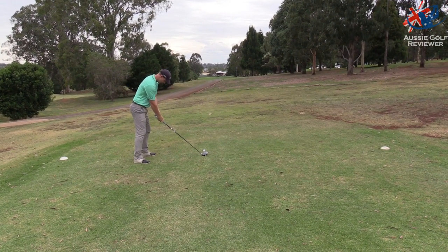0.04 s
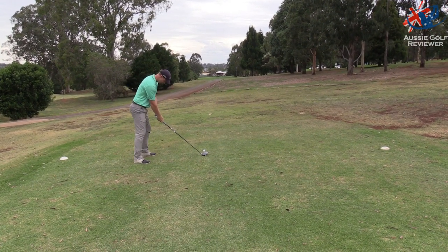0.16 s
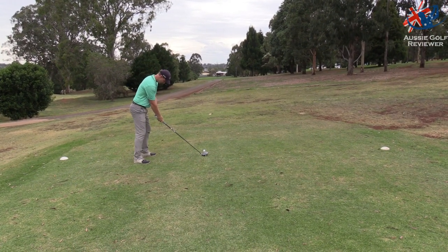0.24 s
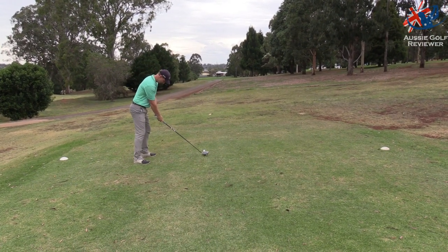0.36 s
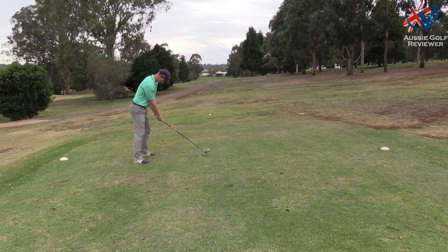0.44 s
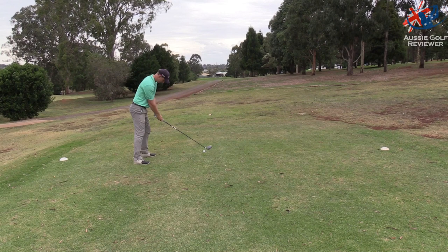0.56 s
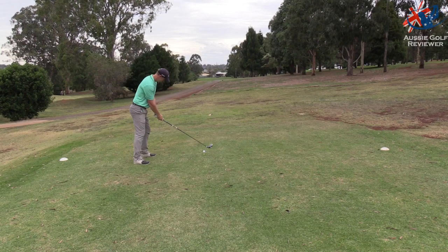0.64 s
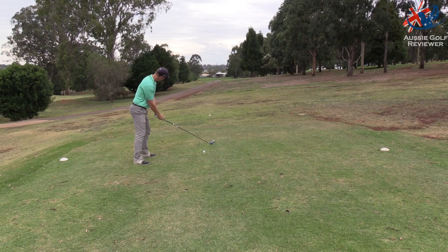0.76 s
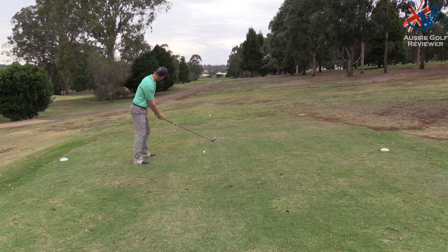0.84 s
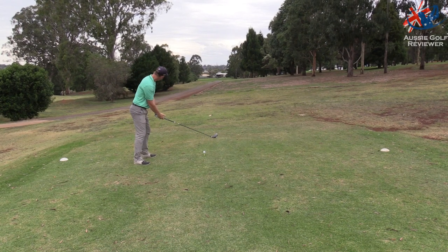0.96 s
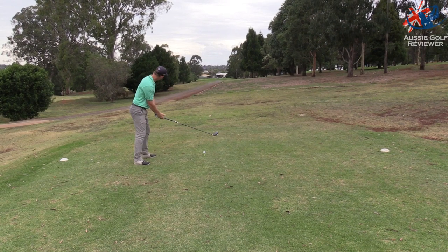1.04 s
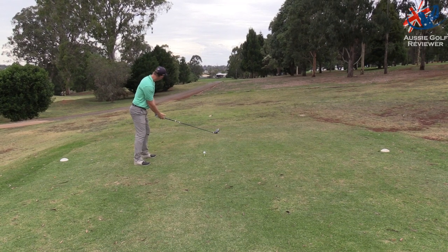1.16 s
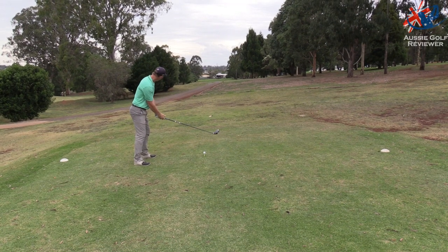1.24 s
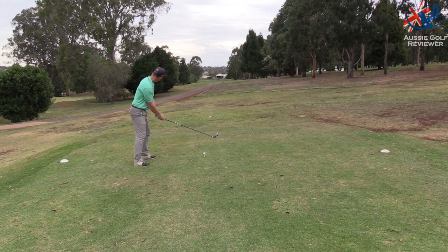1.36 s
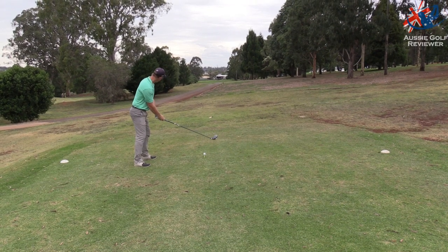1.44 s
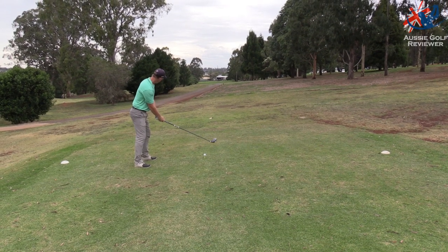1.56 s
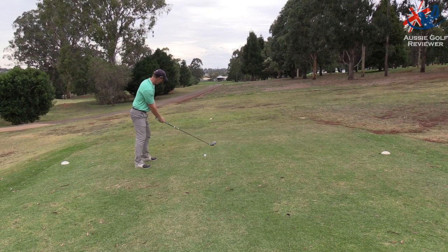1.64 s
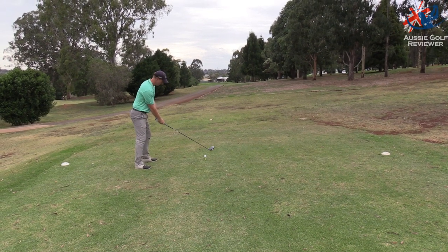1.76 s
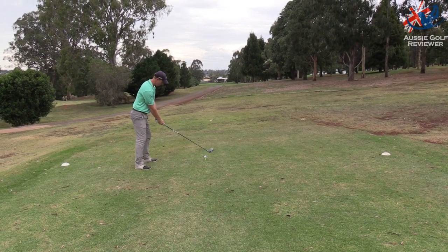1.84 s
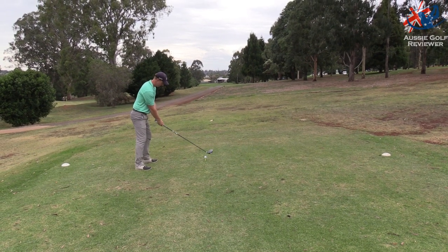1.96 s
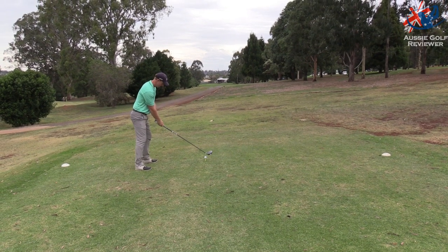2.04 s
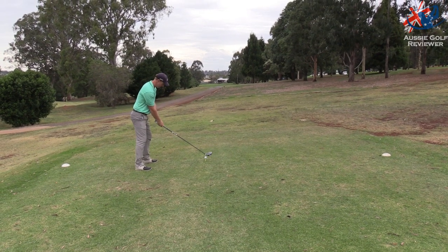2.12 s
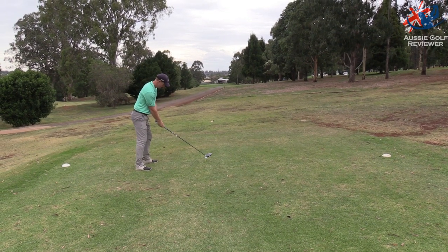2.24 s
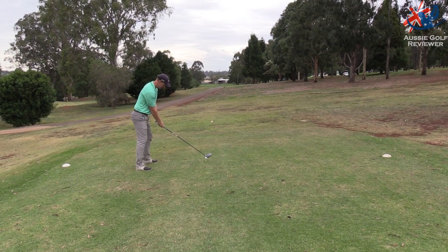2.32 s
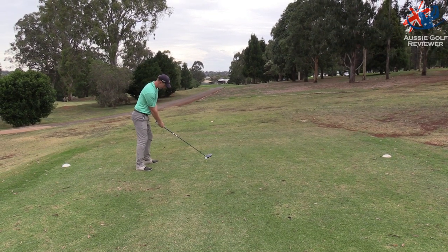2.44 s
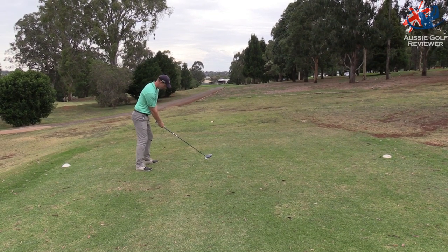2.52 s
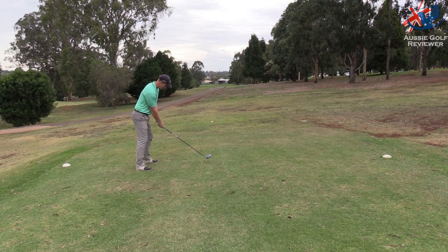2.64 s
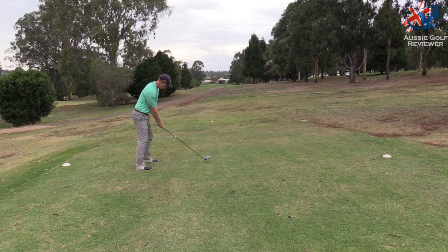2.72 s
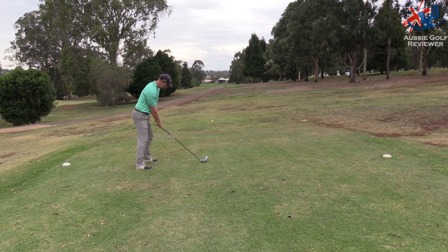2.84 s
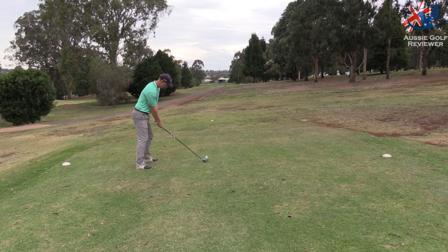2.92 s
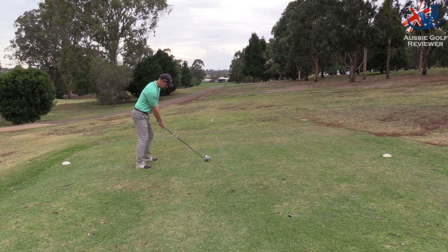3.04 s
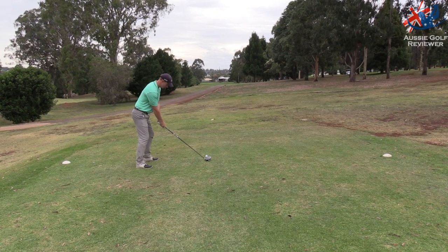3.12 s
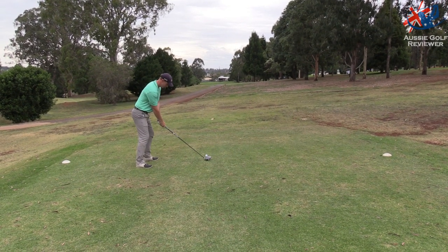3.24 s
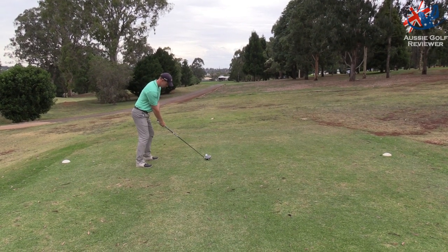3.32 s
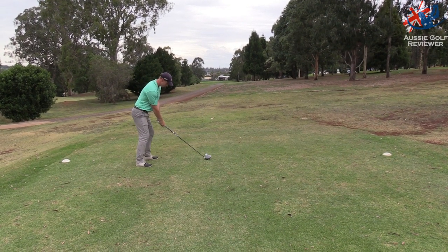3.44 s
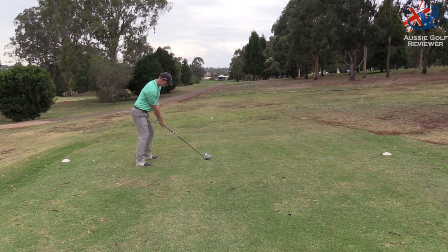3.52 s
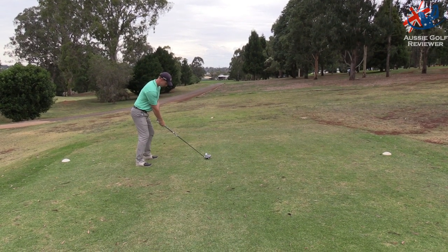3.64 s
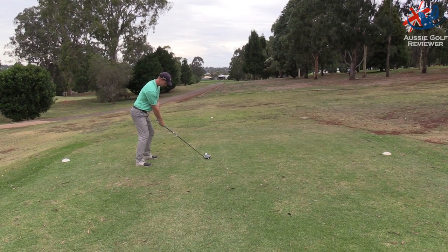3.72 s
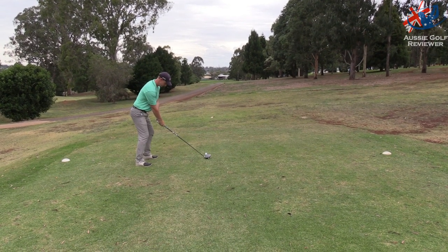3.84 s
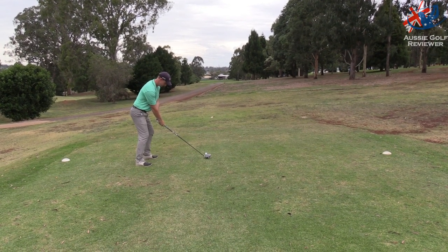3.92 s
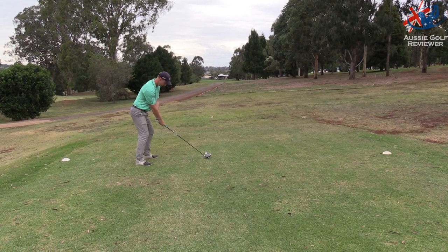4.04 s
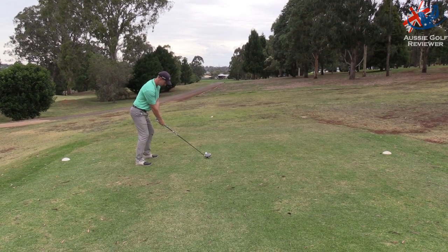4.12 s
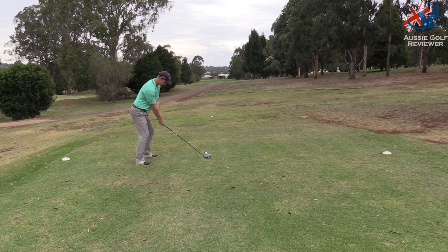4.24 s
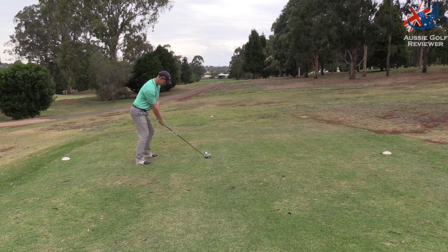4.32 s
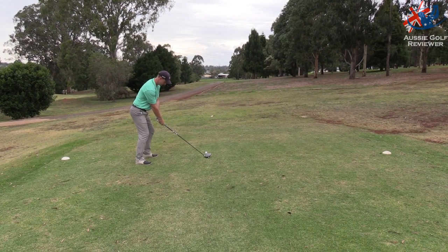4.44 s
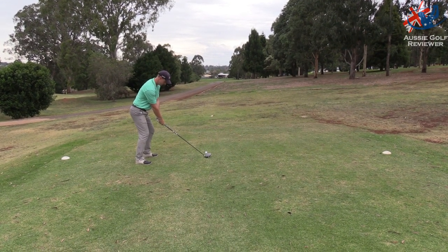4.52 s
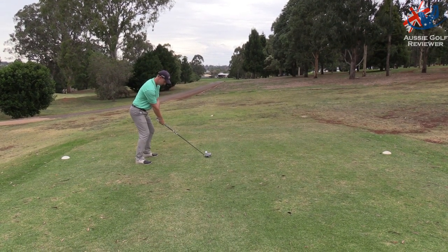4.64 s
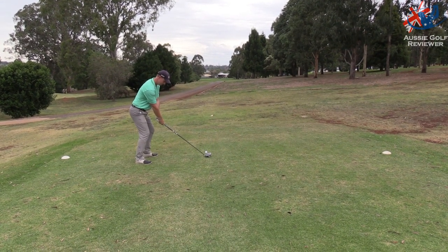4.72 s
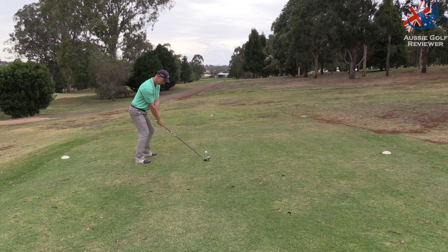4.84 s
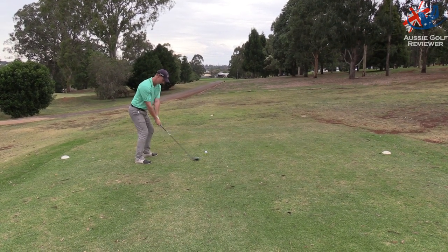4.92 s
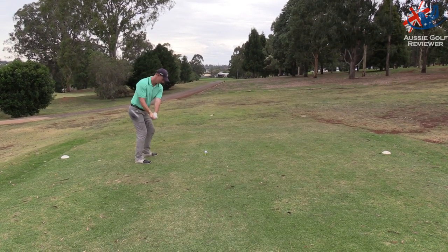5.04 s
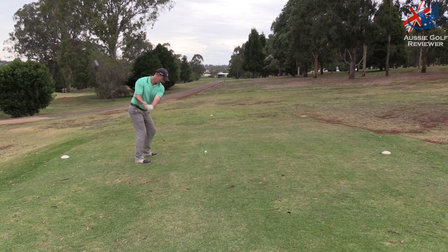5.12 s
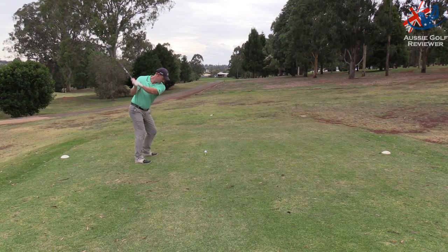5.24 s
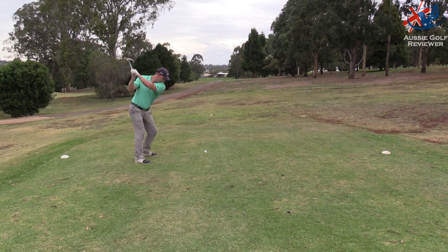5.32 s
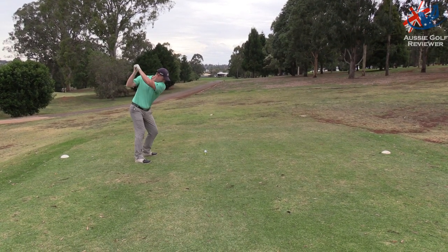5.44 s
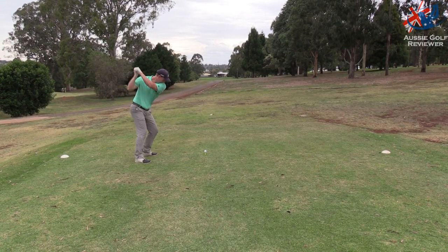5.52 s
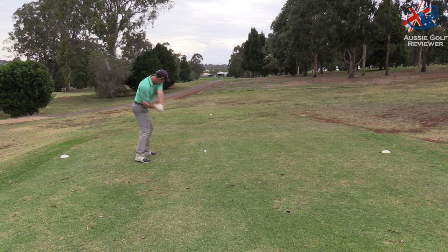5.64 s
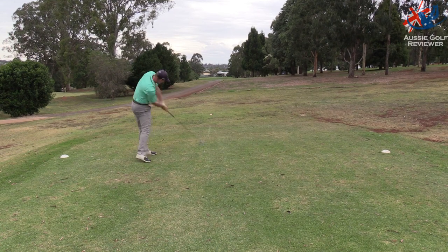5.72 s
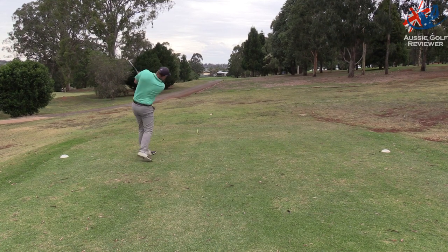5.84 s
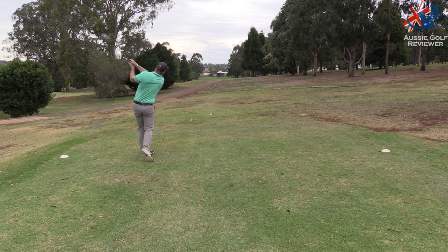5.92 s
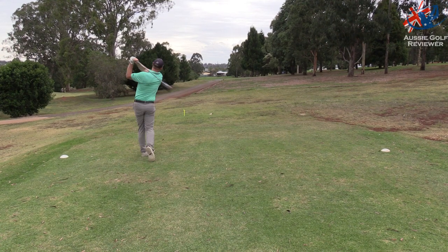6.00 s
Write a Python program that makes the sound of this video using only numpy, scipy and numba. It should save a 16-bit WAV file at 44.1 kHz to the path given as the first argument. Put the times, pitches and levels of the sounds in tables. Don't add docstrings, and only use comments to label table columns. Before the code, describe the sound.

Mostly quiet for over five seconds: muffled wind thumps, faint leafy hiss, short high peeps and rising chirps, occasional tiny crackles. Then a golf club whooshes down and smacks the ball, enormously louder than everything else, bright and hollow with slight overload. A hard slap and scattered tree reflections follow within a fraction of a second, leaving gusty buffeting on the nearby stereo microphone outdoors.

```python
import sys
import numpy as np
from scipy import signal
from scipy.fft import rfft, irfft
from scipy.io import wavfile
from scipy.ndimage import uniform_filter1d
from numba import njit

SR = 44100
rng = np.random.default_rng(int(sys.argv[2]) if len(sys.argv) > 2 else 0)


def store_wav(level_fs):
    pcm = np.round(np.clip(np.atleast_2d(level_fs), -1, 1) * 32767)
    wavfile.write(sys.argv[1], SR, pcm.T.astype(np.int16))


def voltage_ratio(decibels):
    exponent = np.asarray(decibels, float) / 20
    return 10 ** exponent


N = 267642
T = np.arange(N) / SR

# start_s, level_db, contact_s
BLOWS = [
    (5.7737, -22, 0.0002),
    (5.7749, 2.5, 0.00025),
]


def curves(table):
    s, *columns = np.transpose(table)
    return [np.interp(T, s, column) for column in columns]


def shape(points, hz):
    f, db = np.transpose(points)
    return np.interp(np.log(np.maximum(hz, 1)), np.log(f), db)


def unit(x):
    return x / np.sqrt(np.mean(x ** 2))


def coloured(points, channels=1):
    hz = np.arange(N // 2 + 1) * SR / N
    white = rng.standard_normal((channels, N))
    return unit(irfft(rfft(white) * voltage_ratio(shape(points, hz)), N))


def band(x, lo_hz, hi_hz, order=2):
    edges_hz = [lo_hz, min(hi_hz, .45 * SR)]
    return signal.sosfilt(signal.butter(order, edges_hz, "band", fs=SR, output="sos"), x)


def walk(rate):
    hold = int(SR / rate)
    levels = np.resize(rng.standard_normal(2048), N // hold + 1)
    steps = np.repeat(levels, hold)
    return 1.3 * uniform_filter1d(uniform_filter1d(steps, hold), hold)[:N]


def pan(db):
    return voltage_ratio(np.array([[db], [-db]]) / 2)


def stereo(mid, side, side_db):
    return mid + voltage_ratio(side_db) * side * np.array([[1], [-1]])


def add(out, s, sound):
    i = int(round(s * SR))
    out[..., i:i + sound.shape[-1]] += sound[..., :N - i]


def split(x, centres_hz):
    hz = np.maximum(np.arange(N // 2 + 1) * SR / N, 1)
    spectrum = rfft(x)
    place = np.interp(np.log(hz), np.log(centres_hz), np.arange(len(centres_hz)))
    return [irfft(spectrum * np.clip(1 - np.abs(place - k), 0, 1), N) for k in range(len(centres_hz))]


def ring(modes, t):
    out = sum(pan(sum(lean)) * voltage_ratio(db - 60 * t / t60) * np.sin(2 * np.pi * hz * t)
              for hz, db, t60, *lean in modes)
    return out / np.abs(out).max()


@njit
def svf(x, hz, width):
    y, b, l = np.empty(len(x)), 0., 0.
    for i in range(len(x)):
        g, k = np.tan(np.pi * hz[i] / SR), width[i] / hz[i]
        v = (b + g * (x[i] - l)) / (1 + g * (g + k))
        b, l, y[i] = 2 * v - b, l + 2 * g * v, k * v
    return y


def wind():
    # time_s, buffet_db
    gust = [(0.0, -55.5), (0.66, -60), (1.15, -48.5), (1.35, -55.5), (2.45, -58.5), (2.62, -49.5),
            (2.77, -57), (2.85, -51), (4.48, -53), (4.68, -42.5), (4.7, -44), (5.51, -50.5), (5.58, -47.5),
            (5.63, -52.5), (5.68, -44.5), (5.75, -53), (5.78, -46), (6.07, -46.5)]
    # pitch_hz, level_db_per_hz
    buffet = [(12, -46), (20, -12), (43, -8), (70, 0.5), (120, 1), (242, -13.5), (321, -19), (352, -24.5),
              (500, -31), (650, -36), (1100, -120)]
    # centre_s, half_length_s, lift_db
    squalls = [(0.074, 0.071, -3), (.85, 0.03, 10), (1.068, 0.038, 4), (2.39, 0.042, 8), (2.719, 0.038, 10),
               (2.9, 0.063, 8.5), (3.3, 0.037, 3), (4.214, 0.036, 11), (4.353, 0.058, 13.5),
               (4.65, 0.051, 9.5), (4.731, 0.038, 12), (4.794, 0.043, 5), (5.17, 0.035, 16),
               (5.607, 0.03, 11), (6, 0.13, 8.5)]
    # start_s, peak_db,
    # pitch_hz
    thumps = [(1.099, -56, 110), (1.23, -42, 86), (2.62, -43, 114), (2.919, -38, 104.8), (4.35, -43, 105.9),
              (4.648, -38, 89.6), (4.68, -33, 133), (4.77, -46, 61.5), (4.818, -31.5, 102),
              (5.171, -33, 97), (5.165, -39, 200), (5.172, -44, 390), (5.934, -42, 230), (5.99, -42, 260),
              (5.241, -36.5, 187), (5.577, -31, 110), (5.668, -32.5, 124), (5.822, -34, 94),
              (5.921, -29.5, 107), (5.959, -32, 86), (5.989, -41, 77.6)]
    gust_db, = curves(gust)
    upper_db = -2.5 + 0.38 * (gust_db + 50.5)
    for s, half, db in squalls:
        upper_db = upper_db + db * np.exp(-((T - s) / half) ** 2)
    rumble = stereo(*coloured(buffet, channels=2), side_db=-17.5 + 2.5 * walk(5.87))
    low, body, upper = split(rumble, [40, 120, 300])
    flicker = 1.47 * walk(14)
    low = low * voltage_ratio(1.0 + 1.5 * walk(4.3))
    body = body * voltage_ratio(flicker + 2.24 * walk(24))
    upper = upper * voltage_ratio(upper_db + 1.8 * flicker + 3.0 * walk(30))
    out = voltage_ratio(gust_db - 0.6) * (low + body + upper)
    for s, db, hz in thumps:
        cycles = np.arange(int(2.2 * SR / hz)) * hz / SR
        add(out, s - .008, voltage_ratio(db - 3.0) * np.hanning(len(cycles)) * np.sin(2 * np.pi * cycles))
    return out


def leaves():
    # time_s, level_db
    rustle = [(0.0, -62.5), (1.7, -65.5), (3.51, -65.5), (4.09, -65), (5.24, -64.5), (5.54, -63.5),
              (5.65, -59.5)]
    # pitch_hz, level_db_per_hz
    colour = [(88, -44), (150, 2.5), (175, -7.5), (230, -10.5), (333, -14), (725, -14), (1030, -17),
              (1350, -19.5), (2380, -27), (2780, -26.5), (3940, -34), (5930, -33), (8750, -40.5),
              (11700, -48), (15700, -68)]
    # pitch_hz, side_minus_mid_db
    spread = [(60, -14), (110, -31), (200, -7), (380, -12), (700, -14), (1290, -10.5), (2380, -9),
              (4400, -14), (8120, -16), (15000, -4)]
    treble_hold = 1
    level_db, = curves(rustle)
    lift = -treble_hold * level_db
    mid, side = coloured(colour, channels=2)
    reference = np.std(band(mid, 500, 1800, order=4))
    centres_hz = 180 * 2 ** np.arange(0, 6.6, .5)
    out = 0
    for hz, m, d in zip(centres_hz, split(mid, centres_hz), split(side, centres_hz)):
        tilt = np.clip(np.log2(hz / 1500) / 1.4, 0, 1) * (lift - lift.mean())
        out = out + stereo(m, d, shape(spread, hz) + .3) * voltage_ratio(tilt + 1.6 * walk(7.3))
    return out / reference * voltage_ratio(level_db + 0.94)


def birds():
    # start_s, length_s, end_hz, peak_db, upper_voice_peak_db
    sweeps = [(0.042, 0.052, 3300, -67, -63.5), (0.196, 0.038, 3250, -64.5, -75),
              (0.598, 0.041, 3120, -63, -62.5), (1.198, 0.044, 3410, -65.5, -64.5),
              (1.785, 0.04, 3540, -63, -64), (2.392, 0.047, 3360, -64, -66), (3.012, 0.036, 3100, -66, -67),
              (3.516, 0.049, 3170, -61.5, -65.5), (3.96, 0.049, 3270, -71, -81),
              (4.438, 0.052, 3800, -64, -70), (5.202, 0.041, 2970, -70, -67)]
    # centre_s, start_hz, end_hz, peak_db
    peeps = [(.072, 4360, 4630, -66), (.08, 2744, 3310, -62.5), (.103, 4790, 4650, -70),
             (.12, 4600, 5000, -69), (.142, 3730, 3920, -67), (.224, 5380, 6100, -69),
             (.235, 4000, 3790, -62), (.488, 2490, 3400, -69), (.513, 3990, 4430, -62),
             (.641, 4000, 4300, -64), (.661, 3420, 3700, -65), (1.02, 4300, 4700, -73),
             (1.132, 2940, 3120, -66.5), (1.149, 4274, 4900, -63.5), (1.271, 4570, 4150, -67),
             (1.54, 3580, 3410, -69), (1.801, 4750, 4700, -66), (2.358, 2580, 2900, -64.5),
             (2.372, 4630, 4700, -65.5), (2.436, 3670, 4100, -73), (2.903, 4810, 4700, -72),
             (3.032, 2460, 2870, -70), (3.055, 4310, 4700, -65), (3.066, 3410, 3600, -69),
             (4.077, 4760, 4900, -63), (4.652, 2650, 2770, -68), (5.198, 3560, 3630, -68),
             (5.238, 7300, 8100, -70), (5.246, 3720, 3910, -61.5), (5.382, 4740, 4660, -71),
             (.152, 2870, 2920, -72), (.478, 3700, 4080, -68), (.67, 3300, 3130, -70),
             (1.595, 3330, 3300, -67), (2.11, 5900, 6000, -71), (2.438, 4000, 4100, -70),
             (4.22, 4000, 3950, -73), (4.63, 4550, 4640, -69), (4.685, 3740, 3790, -72),
             (4.812, 5300, 5900, -70), (5.07, 5600, 5650, -69), (5.075, 3750, 3700, -71),
             (5.228, 2510, 2700, -64)]
    # centre_s, start_hz, end_hz, peak_db
    whistles = [(.1, 4250, 4150, -69), (.18, 5300, 5600, -73), (.243, 13200, 13700, -89),
                (.283, 13200, 11800, -90), (1.045, 3620, 3900, -75), (1.1, 4300, 4600, -74),
                (2.15, 4300, 4600, -75), (2.183, 5980, 5760, -71), (3.656, 3900, 3120, -77),
                (3.912, 3930, 4080, -72), (4.27, 3950, 3950, -75), (4.366, 2600, 3900, -69.5),
                (4.824, 2450, 4050, -66.5), (4.835, 5750, 5900, -75), (4.868, 4550, 5150, -71),
                (4.905, 4250, 4300, -73), (5.03, 4600, 4500, -73), (5.23, 2800, 4100, -65.5),
                (5.27, 2750, 2700, -71), (5.27, 4900, 5150, -74)]
    # centre_s, spread_s, level_db
    flock = [(.15, 0.227, -90), (0.599, 0.13, -90), (1.13, 0.23, -81.5), (2.2, 0.37, -86), (3.3, .6, -83),
             (4.62, 0.31, -80), (5.0, 0.22, -80.5)]
    call_start_hz, peep_s, whistle_s = 2200, 0.025, 0.062
    upper_lead_s = 0.0058

    chatter = []
    for (centre, spread, db), calls in zip(flock, rng.random((len(flock), 90, 5))):
        for a, b, c, d, e in calls:
            s, length = abs(centre + spread * (2 * a - 1)), 0.016 + .04 * b
            hz = 3600 + 2200 * c ** 2
            chatter.append((s, length, hz, hz * (.95 + 0.126 * d), db + 2.5 * e))
    near = [(s, length, call_start_hz, hz, db) for s, length, hz, db, _ in sweeps]
    near += [(s - upper_lead_s, length, 2 * call_start_hz, 1.9 * hz, db) for s, length, hz, _, db in sweeps]
    far = [(s - peep_s / 2, peep_s, *rest) for s, *rest in peeps]
    far += [(s - whistle_s / 2, whistle_s, *rest) for s, *rest in whistles]

    dry, waver = np.zeros((2, N)), 1 + .012 * walk(rate=200)
    for rows, side_db in ((near, 1.5), (far, -1.5), (chatter, .4)):
        for s, length, hz0, hz1, db in rows:
            u = np.arange(int(length * SR)) / (length * SR)
            glide = u + 0.69 * u * (u - 1)
            hz = (hz0 + (hz1 - hz0) * glide) * waver[int(s * SR):][:len(u)]
            voice = voltage_ratio(db) * np.sin(2 * np.pi * np.cumsum(hz) / SR)
            add(dry, s, pan(side_db) * voice * np.sin(np.pi * u ** 1.3))
    dry = dry * voltage_ratio(2.0 * walk(150))
    scatter = rng.standard_normal((2, SR // 4)) * voltage_ratio(-60 * T[:SR // 4] / .25)
    return dry + voltage_ratio(-32) * signal.fftconvolve(dry, scatter, axes=1)[:, :N]


def ticks():
    # start_s, peak_db, centre_hz, left_minus_right_db
    snaps = [(0.434, -51.5, 3520, 12), (0.474, -54, 3870, 12), (.64, -57, 5000, 0), (.648, -60, 5500, 0),
             (0.6305, -51.5, 5580, 5), (0.658, -61, 6500, -6), (0.665, -50, 3500, -1),
             (1.6873, -58, 3340, 9), (1.7627, -57.5, 3040, 2.5), (1.9229, -61, 5610, -1.5),
             (2.0496, -60, 4330, -1), (2.1698, -52.5, 7000, 6), (5.978, -46, 3000, 0)]
    out, t = np.zeros((2, N)), T[:600]
    for (s, db, hz, pan_db), noise in zip(snaps, rng.standard_normal((len(snaps), 600))):
        crackle = band(noise * voltage_ratio(-60 * t / 0.024), hz / 1.8, hz * 1.1, order=1)
        snap = band(crackle, 1100, 9400, order=4)
        add(out, s, pan(pan_db) * voltage_ratio(db) * snap / np.abs(snap).max())
    return out


def swing():
    # time_s, level_db, shaft_speed_m_per_s, howl_above_hiss_db
    downswing = [(5.64, -79, 17.26, -6), (5.708, -67, 31, -6), (5.711, -53.5, 31, -4),
                 (5.732, -50.5, 40.3, 4), (5.745, -51.5, 39, -4), (5.758, -47, 45.5, 3),
                 (5.774, -53, 49, -6), (5.80, -63, 52, 3), (6.0, -82, 23.7, -8)]
    # pitch_hz, level_db_per_hz
    swish = [(710, -33), (1200, -1), (1410, -4), (1870, -2), (2600, -13), (3030, 0.5), (4090, 1.5),
             (6490, -6), (15700, -35.5)]
    strouhal, shaft_m = .2, .0095
    hiss_db, speed, howl_db = curves(downswing)
    hz = strouhal * speed / shaft_m
    air = rng.standard_normal(N)
    tone = np.sin(2 * np.pi * np.cumsum(hz * (1 + .03 * walk(200))) / SR)
    howl = voltage_ratio(-1) * tone
    howl = howl + voltage_ratio(-5) * unit(svf(air, hz, 0.24 * hz))
    howl = howl + voltage_ratio(-15) * unit(svf(air, 2 * hz, 0.12 * hz))
    rumble = voltage_ratio(-6) * unit(band(air, 350, 1870))
    hiss = stereo(*coloured(swish, channels=2), side_db=-18.5)
    return voltage_ratio(hiss_db) * (voltage_ratio(howl_db) * howl + rumble + voltage_ratio(2.0 * walk(60)) * hiss)


def echoes():
    # delay_s, level_db, rise_s, t60_s, low_cut_hz
    reflectors = [(.003, -23, 0.00088, 0.029, 1500), (.0146, -26, 0.00073, 0.029, 2460),
                  (0.0574, -32, 0.00077, 0.13, 5600), (.068, -43, .01, 0.31, 2200),
                  (.172, -42, .006, 0.2, 4800), (.17, -50, .01, .3, 2800), (.2, -46, .015, 0.4, 2000)]
    # pitch_hz, level_db_per_hz
    scattered = [(470, -36), (800, -8), (895, -3), (2450, -7), (3350, -6), (3890, 0), (4410, -5.5),
                 (4990, -6.5), (9300, -15.5), (13500, -26), (15700, -57)]
    # pitch_hz, half_width_hz, level_db
    streaks = [(1560, 44, -18), (3000, 100, -18), (5140, 110, -10), (5600, 110, -19), (6330, 100, -12),
               (7000, 120, -17), (8000, 140, -19)]
    # delay_s, pitch_hz, peak_db, rise_s, t60_s
    returns = [(0.024, 3700, -40.5, .005, 0.076), (0.064, 4800, -41, .002, 0.073),
               (.06, 4950, -36.5, 0.0027, 0.12), (0.08, 4800, -45, .003, 0.086),
               (.073, 3980, -39, .004, 0.068), (0.079, 3900, -39.5, 0.01, .17),
               (.066, 2980, -51, 0.0091, 0.18), (.045, 1570, -54, .02, .3), (.172, 3800, -52, 0.013, 0.36),
               (.176, 6280, -49, .004, .15), (0.17, 5820, -52, .01, .5), (.19, 5370, -53, .01, .5),
               (.184, 7910, -59, .006, 0.26), (.216, 3600, -51, .005, 0.16)]
    t, out = T[:SR // 3], np.zeros((2, N))
    impact_s = BLOWS[1][0]

    def swell(rise, t60):
        return (1 - np.exp(-t / rise)) * voltage_ratio(-60 * t / t60)

    arrivals = stereo(*coloured(scattered, channels=2), side_db=-16)
    arrivals = arrivals * voltage_ratio(1.4 * walk(200))
    arrivals = arrivals + sum(voltage_ratio(db) * unit(band(arrivals, hz - half, hz + half, order=1))
                              for hz, half, db in streaks)
    for k, (delay, db, rise, t60, lo_hz) in enumerate(reflectors):
        top_hz = 14500 - 20000 * delay
        cloud = band(arrivals[:, k * len(t):(k + 1) * len(t)], lo_hz, top_hz)
        add(out, impact_s + delay, voltage_ratio(db) * cloud * swell(rise, t60))
    waver, flicker = walk(300), walk(150)
    for k, (delay, hz, db, rise, t60) in enumerate(returns):
        part = slice(k * len(t), (k + 1) * len(t))
        pitch_hz = hz * (1 - .2 * t + .02 * waver[part])
        tone = np.sin(2 * np.pi * np.cumsum(pitch_hz) / SR)
        add(out, impact_s + delay, voltage_ratio(db + 4 * flicker[part]) * tone * swell(rise, t60))
    return out


def strike():
    # pitch_hz, level_db, t60_s, left_minus_right_db
    head = [(1260, -16.5, 0.041, 5), (1820, -14, 0.016, 2), (2782, -20, 0.061, 12), (3030, -13, 0.05, 3),
            (3410, -6, 0.045, -3.5), (4290, -9, 0.036, -5), (4310, -9, 0.041, 8), (4555, -6, 0.046, -3),
            (5040, -26, 0.04, -4), (5181, -20, 0.04, 3.5), (4360, -9, 0.047, 0), (5410, -2, 0.04, -3),
            (5530, -1, 0.033, 1), (5900, -19, 0.036, -1), (6100, -11, 0.031, 5), (6530, -9, 0.032, -3),
            (6400, -13, 0.038, -2), (8780, -17, 0.028, 4), (9430, -10.5, 0.018, -3), (10800, -19, 0.034, 4),
            (11400, -16, 0.016, -3), (13700, -16, .012, 2)]
    # pitch_hz, level_db, t60_s, left_minus_right_db
    squash = [(374, 1.5, 0.012, -2), (470, 3, 0.0056, 1.5), (654, -4.5, 0.016, -2), (785, -12, 0.01, 9)]
    # pitch_hz, level_db_per_hz
    splinter = [(88, -41), (150, -22), (971, -10), (1300, -31.5), (1990, -40), (3370, -15), (4430, 3),
                (4980, 1), (5490, -19), (7490, -5), (15700, -22)]
    # pitch_hz, level_db, t60_s
    bounce = [(2762, -12, 0.042), (3600, -7, 0.04), (4000, -18, .04), (4630, 0, 0.032), (5100, 2, 0.014),
              (5530, -14, 0.025), (6400, -16, .037), (6700, -6, 0.03), (6970, 3, 0.016), (7550, -18, .029),
              (10400, -9, .015), (11850, -21.5, .027), (14800, -15, .008)]
    ring_db, shock_db, thud_db = 1, -5.5, -13.5
    crack_db, crack_t60_s = -20, 0.034
    bounce_s, bounce_db = .0144, -6.5
    t, out = T[:SR // 8], np.zeros((2, N))
    noise = stereo(*coloured(splinter, channels=2), side_db=-14)[:, :len(t)]
    crack = voltage_ratio(crack_db - 60 * t / crack_t60_s) * noise
    thud = voltage_ratio(thud_db) * ring(squash, t)
    ringing = voltage_ratio(ring_db) * ring(head, t)
    for s, db, contact in BLOWS:
        shock = -np.sin(np.pi * np.clip(t[:64] / contact, 0, 1))
        add(out, s, pan(1.1) * voltage_ratio(db + shock_db) * shock)
        add(out, s + contact, voltage_ratio(db) * (thud + ringing + crack))
    returned = ring(bounce, t) * (1 - np.exp(-t / .0004))
    add(out, BLOWS[1][0] + bounce_s, voltage_ratio(bounce_db) * returned)
    return band(out, 140, 20000)


def scene():
    return wind() + leaves() + birds() + ticks() + swing() + echoes() + strike()


def band_limit(x):
    return signal.sosfilt(signal.butter(12, 15840, fs=SR, output="sos"), x)


def record(dry):
    ceiling, top_hz = .93, 15800
    top = signal.ellip(8, .2, 70, top_hz, fs=SR, output="sos")
    mix = signal.sosfilt(top, np.clip(dry, -ceiling, ceiling))
    return band_limit(mix)


dry = scene()
out = record(dry)
store_wav(out)
```